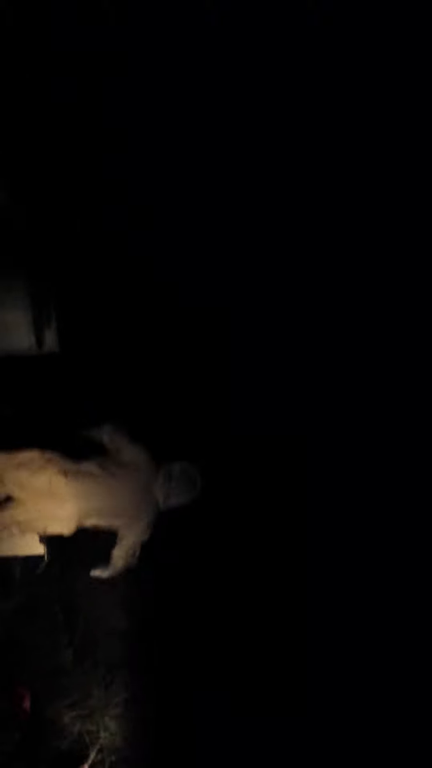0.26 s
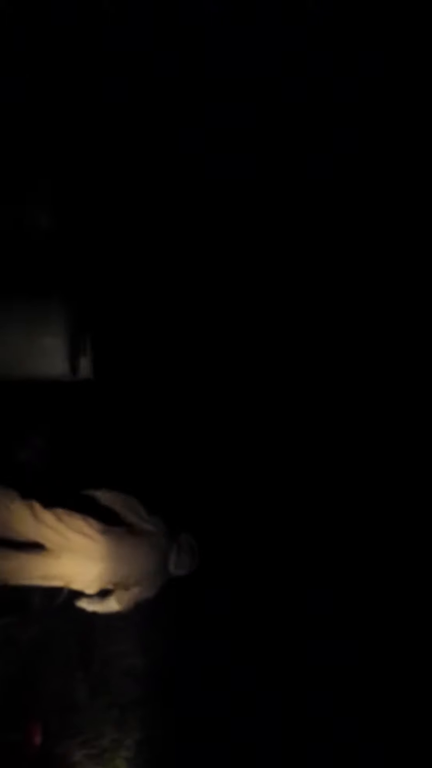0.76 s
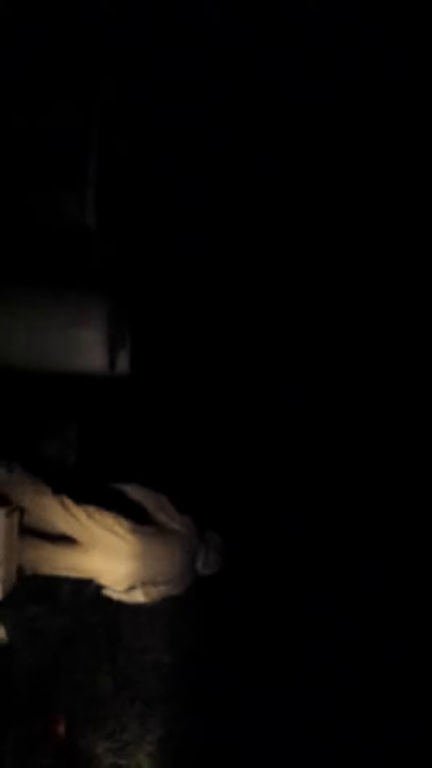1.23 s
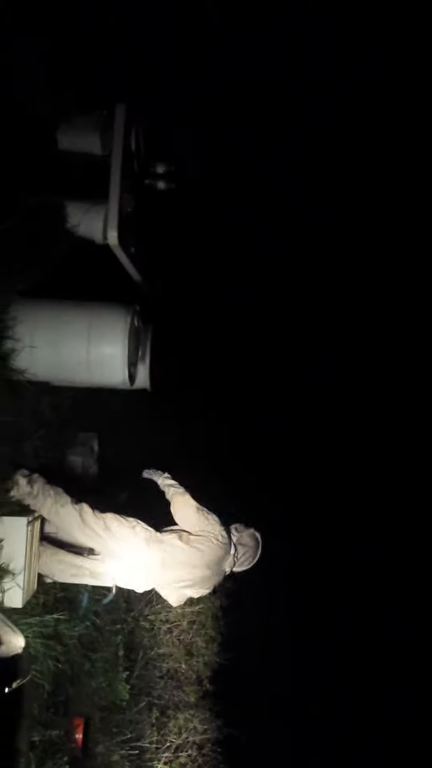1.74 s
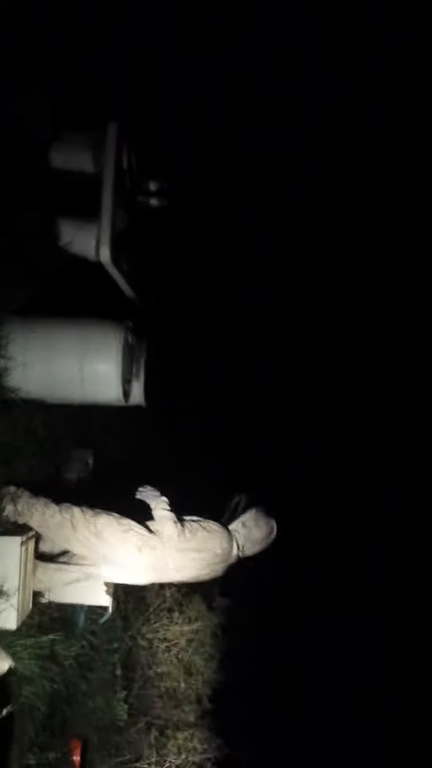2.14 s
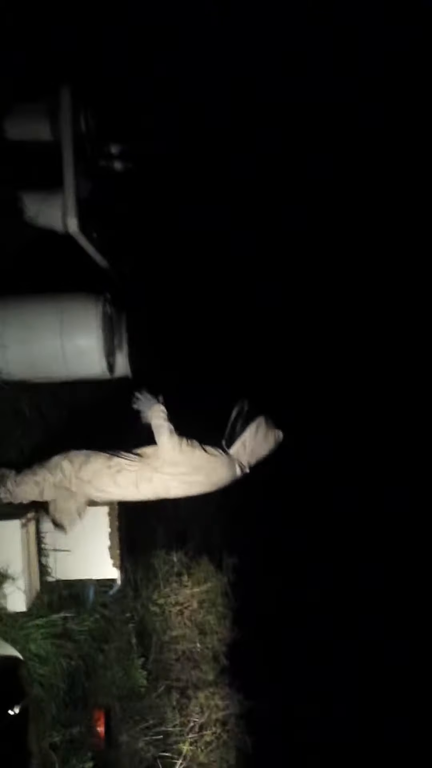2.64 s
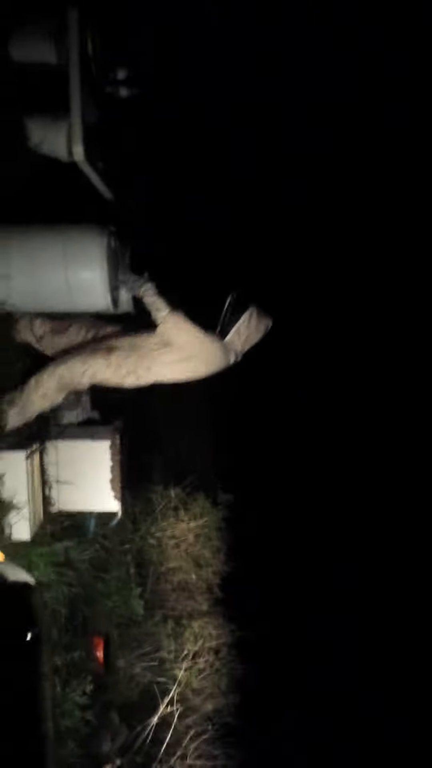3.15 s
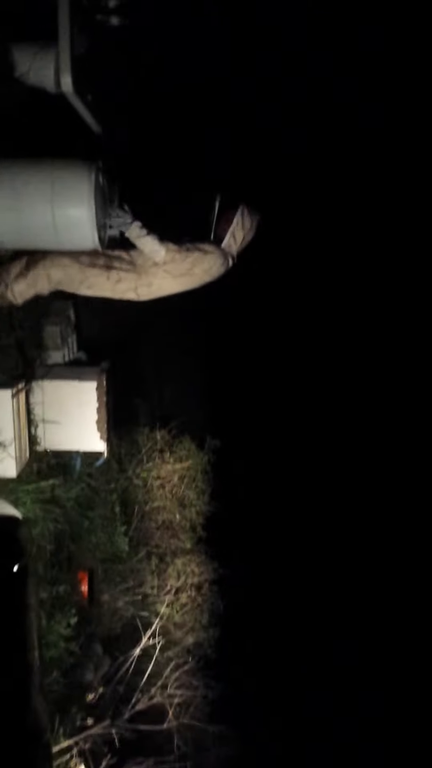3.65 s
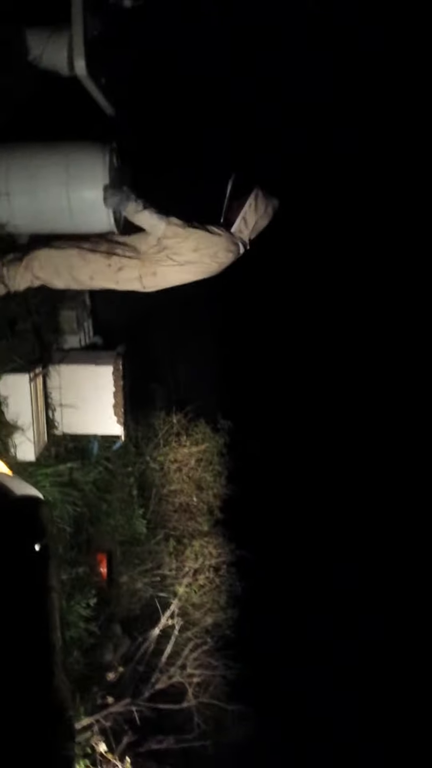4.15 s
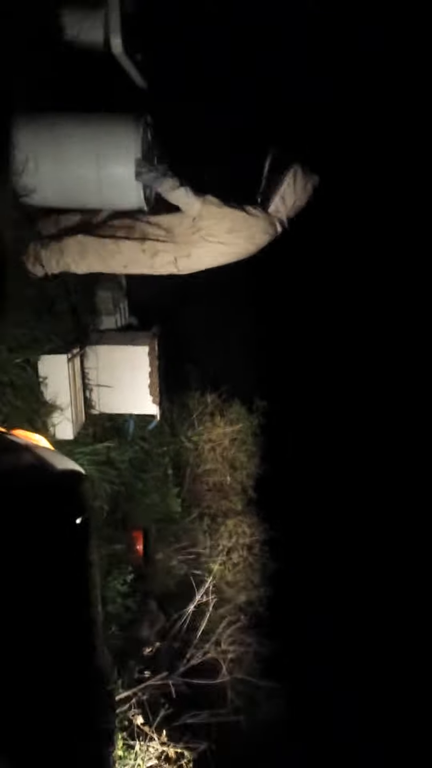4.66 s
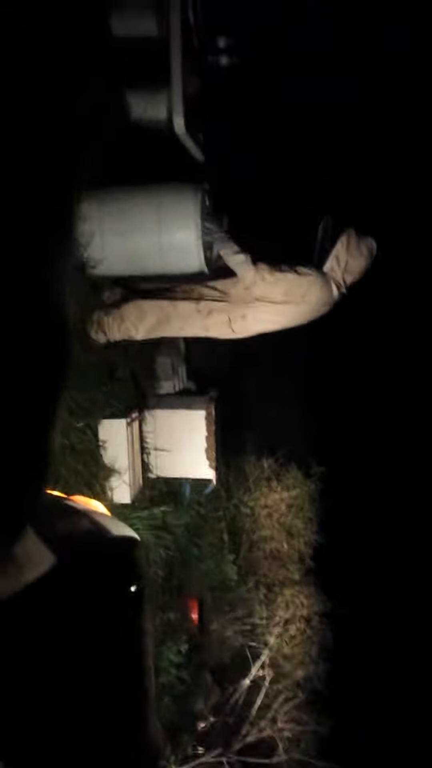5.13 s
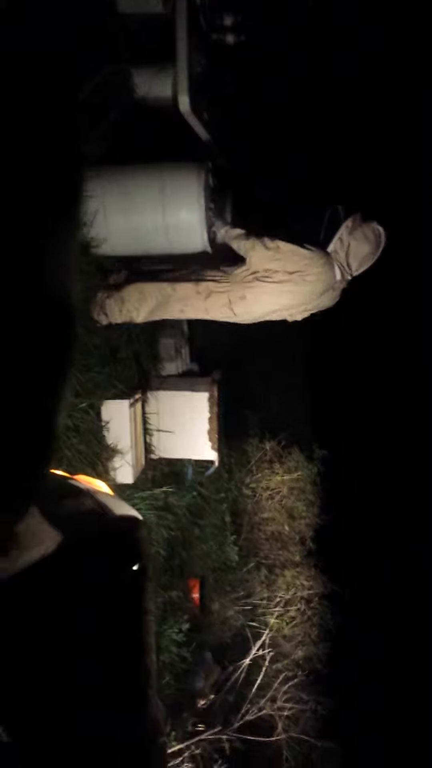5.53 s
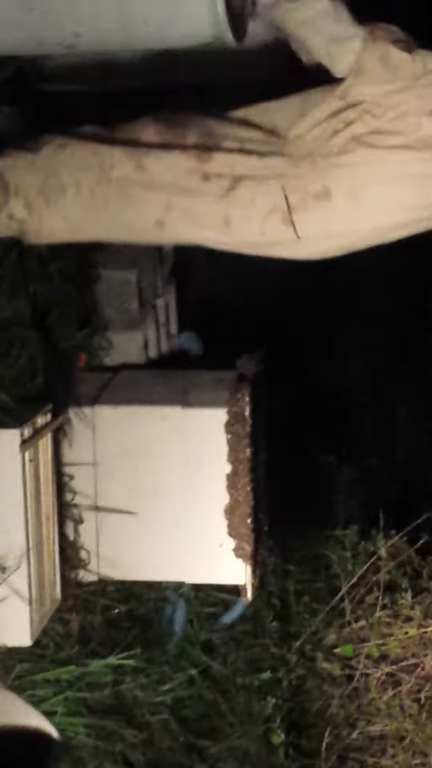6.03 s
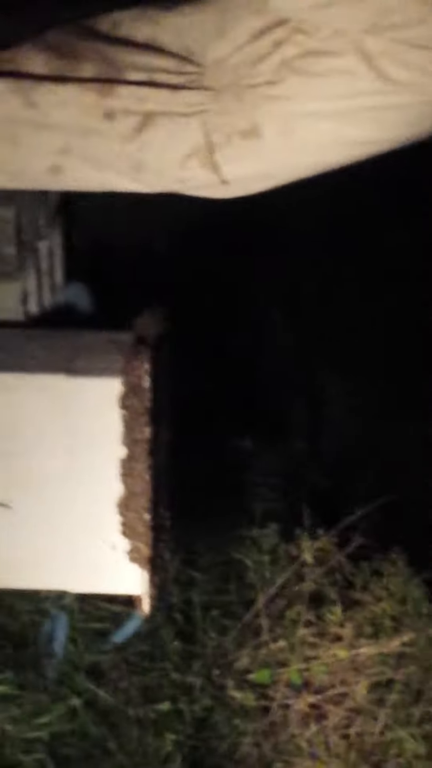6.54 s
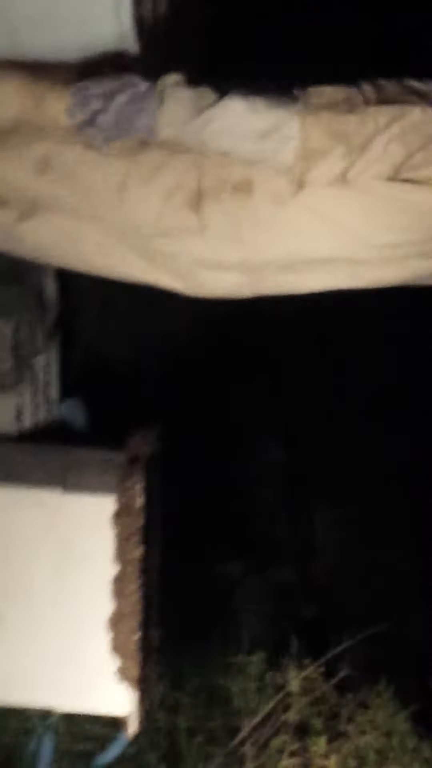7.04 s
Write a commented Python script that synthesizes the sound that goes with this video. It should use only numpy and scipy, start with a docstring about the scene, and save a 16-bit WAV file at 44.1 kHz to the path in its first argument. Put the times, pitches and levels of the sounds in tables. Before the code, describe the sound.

A high cricket chorus over a low outdoor rumble, with a few wooden clacks, soft fabric rustles, a lid creak and sharp microphone clicks.

```python
"""A bee yard at night

Crickets scrape their wings all around, over a low rumble and the hum of a far engine. Hive gear
clacks on a wooden box, a lid creaks and a beekeeper's suit swishes. The camera is bumped, rubbed
and ticked. The sound fades in; two sharp ticks overload the recorder, whose gain control turns
the night down for about a second."""
import sys
import numpy as np
from scipy import signal
from scipy.fft import rfft, irfft
from scipy.io import wavfile

SR = 44100
rng = np.random.default_rng(int(sys.argv[2]) if len(sys.argv) > 2 else 0)


def put_to_file(sound):
    """Save the sound as 16-bit audio at rate SR, in the file named by the first command-line argument."""
    columns = np.atleast_2d(sound).T  # one column per channel
    safe = np.clip(columns, -1, 1)
    whole_steps = np.round(safe * 32767)
    wavfile.write(sys.argv[1], SR, whole_steps.astype(np.int16))


N = 321489
TIME = np.arange(N) / SR

# Near crickets. Each row: wing strokes a second, mid-stroke pitch in Hz, pitch fall in Hz, relative
# level in dB, side in dB (plus is left, minus is right), phase between the ears in radians.
NEAR_CRICKETS = [(38.5, 5690, 660, 0, 3, 4.5), (36.66, 5720, 480, -2.5, 2.5, -0.5),
                 (38.7, 6330, 400, -6.5, 1.5, -1.5)]
# The chorus as the camera turns. Each row: time in seconds, then level, side and near crickets' lift in dB.
CHORUS_LEVELS = [(0.6, -40, 2.5, -1), (1.9, -42, 3, -1.5), (2.4, -39.5, 1, -4.5), (3.2, -42, 2.5, -4),
                 (3.7, -42, 3, -3), (5.5, -40, -2, -2), (6.3, -42.5, -1.5, -3), (6.85, -41.5, -0.5, 2.5),
                 (7.29, -42, -1.5, 0.5)]
# The night air. Each row: time in seconds, then the rumble, wash and hiss levels in dB.
AIR_LEVELS = [(0.6, -39.5, -47.5, -48), (1.7, -40.5, -47.5, -48), (2.6, -40, -45.5, -45),
              (3.3, -38.5, -45.5, -45.5), (4.2, -39, -45, -47.5), (5.6, -40, -45, -47.5),
              (6.85, -39.5, -43, -49.5), (7.29, -40, -44, -48)]
# The far engine. Each row: time in seconds, level in dB.
ENGINE_LEVELS = [(0.6, -46), (1.5, -64), (1.6, -41.5), (3.0, -45.5), (3.1, -54), (4.4, -42.5), (6.4, -56.5),
                 (7.29, -45)]
# How alike outdoor noise is in both ears. Each row: frequency in Hz, likeness from 0 to 1.
EAR_LIKENESS = [(25, 0.33), (60, 0.96), (130, 0.93), (290, 0.94), (640, 0.78), (1400, 0), (3000, 0.024)]

# The tone colour of each noise. Each row: frequency in Hz, relative strength in dB.
FAR_CRICKET_COLOUR = [(4900, -56), (5250, -12), (5500, -1), (5780, -2.5), (6100, 0), (6350, -5.5),
                      (6700, -10.5), (7500, -16), (8300, -14), (8700, -21.5), (10000, -43)]
RUMBLE_COLOUR = [(12, -34), (20, -16), (33, -9.5), (60, -4), (110, 0.5), (160, -1), (215, -5.5),
                 (300, -5.5), (400, -7.5), (490, -20.5), (800, -27), (2000, -60)]
WASH_COLOUR = [(300, -11.5), (500, -4), (660, -0.5), (850, -4), (1100, -4.5), (1400, -10.5), (1800, -9),
               (2400, -14.5), (3200, -19.5), (6000, -39.5)]
LEFT_HISS_COLOUR = [(600, 7), (2000, -1.5), (4500, 1.5), (7000, 5.5), (9200, -2.5), (10100, -11),
                    (14500, -27)]
RIGHT_HISS_COLOUR = [(600, 3), (2000, -2.5), (4500, -6.5), (7200, 4.5), (9200, -6), (11300, -4),
                     (14500, -7.5)]
CRACK_COLOUR = [(200, -15), (600, -13), (1300, -13.5), (1900, -7), (2450, -10), (3000, -5.5), (3700, -13.5),
                (4250, -1), (4900, -9), (6000, -4.5), (7500, 2.5), (8600, -11), (10500, -21),
                (12600, -14.5), (14500, -23)]
SUIT_COLOUR = [(500, -49), (2500, -6.5), (4500, -4.5), (6000, 1.5), (7700, 4), (9200, -4), (11000, -5),
               (14500, -11)]
SNAG_COLOUR = [(2500, -31), (5000, -12), (7800, 10.5), (9200, 9), (10500, 4), (14500, -8)]
SHUDDER_COLOUR = [(20, -20), (60, -10), (130, 9), (220, -3.5), (420, -17.5), (800, -19), (1200, -23),
                  (1800, -40), (4000, -55)]
RUB_COLOUR = [(150, -4), (700, 4.5), (1300, 7.5), (2400, 0), (4000, -15.5), (6500, -6), (9000, -14),
              (11000, -44)]
FIZZ_COLOUR = [(800, 1.5), (2400, 3.5), (5000, 3), (8000, -2.5), (10500, -20), (14500, -33)]

# The ringing tones of the wooden box, the lid, and the camera's body and case.
# Each row: pitch in Hz, relative level in dB, seconds to fade by 60 dB.
BOX_TONES = [(320, 0.5, 0.045), (435, 5.5, 0.058), (568, 12, 0.064), (618, 12, 0.052), (740, 3, 0.05),
             (1030, 3, 0.07), (1320, 1.5, 0.042), (1845, 4.5, 0.04), (2410, -14, .07), (6220, 4, .05)]
LID_TONES = [(1850, 4, 0.0055), (2315, 15, 0.0071), (2500, -4, 0.01), (3220, -6, .008)]
BODY_TONES = [(140, -15, .12), (408, 5, 0.1), (428, 1, 0.23), (760, 4, 0.056), (990, -5, 0.027),
              (1220, -5, 0.067)]
CASE_TONES = [(905, -12, 0.0051), (2370, 8.5, 0.0019), (3000, -21, 0.0015), (3600, 9.5, 0.002),
              (6490, 15.5, 0.0019), (8260, 1, 0.0036)]

# Hive gear knocks. Each row: start in seconds, crack level in dB, rise and fall in seconds,
# box ring in dB before its lift.
GEAR_CLACKS = [(0.412, -36, .0004, .002, -68.5), (0.5089, -23, 0.00069, 0.0076, -21.5),
               (1.2538, -16, 0.0033, 0.003, -34.5), (1.3275, -16, 0.0024, 0.0019, -31),
               (2.7582, -44, 0.00091, 0.0018, -55), (4.4052, -19.5, 0.00016, 0.0019, -24),
               (4.4297, -31.5, 0.00097, 0.0022, -37)]
# Lid creaks. Each row: start in seconds, length in seconds, level in dB.
LID_CREAKS = [(0.413, .007, -27), (2.761, .007, -26.5), (6.271, .007, -31), (6.3657, .195, -34.5),
              (6.777, .025, -39), (6.824, .025, -30)]
# Sleeve and leg movements. Each row: middle and half length in seconds, level and side in dB.
SUIT_SWISHES = [(3.03, 0.062, -41, 1), (3.61, 0.13, -40, 5), (4.478, 0.13, -41.5, 3),
                (4.8, 0.08, -51.5, -14), (7.2, 0.15, -49.5, -3)]
# The fabric catches. Each row: start in seconds, level in dB.
SUIT_SNAGS = [(3.308, -40), (3.315, -34), (6.448, -39.5), (7.258, -35)]
# Bumps on the camera. Each row: start in seconds, strength in dB, pitch in Hz, side in dB.
CAMERA_BUMPS = [(3.987, -16.5, 99, 27), (4.1102, -19.5, 90, 22), (4.139, -15, 126, 9),
                (4.4053, -4, 169, -2), (4.562, -19.5, 88.5, 24)]
# Finger slides. Each row: middle and half length in seconds, level and side in dB, fizz as a factor.
FINGER_RUBS = [(4.433, 0.014, -40, -2, 0.1), (4.65, 0.013, -28, 14, 1.35), (4.865, 0.015, -29, 10, 0.064)]
# Ticks by the left microphone. Each row: start in seconds, strength in dB, side in dB.
CASE_TICKS = [(4.803, -15.5, 16), (4.8136, -9.5, 28), (4.9093, 22.5, 27), (5.1184, 13, 15),
              (5.453, -18, 12)]


def amp(db):
    """Turns decibels into a gain."""
    return 10 ** (np.asarray(db) / 20)


def evened(x):
    """Scales a signal to an average power of one."""
    return x / np.sqrt(np.mean(x ** 2) + 1e-20)


def read(points, hz):
    """Looks up frequencies in a table, giving each octave equal room."""
    f, value = np.transpose(points)
    return np.interp(np.log(hz + 1), np.log(f), value)


def curves(rows):
    """Each column of a time table, at every sample."""
    times, *columns = np.transpose(rows)
    return [np.interp(TIME, times, column) for column in columns]


def pan(db):
    """Left and right gains that keep the total power the same."""
    gains = np.array([amp(np.atleast_1d(db) / 2), amp(-np.atleast_1d(db) / 2)])
    return gains / np.sqrt(np.mean(gains ** 2, axis=0))


def add(mix, start, sound):
    """Mixes a sound in, start seconds from the beginning."""
    part = mix[:, round(start * SR):][:, :sound.shape[-1]]
    part += sound[..., :part.shape[-1]]


def drift(hz):
    """A random wobble, mostly slower than hz."""
    f = np.fft.rfftfreq(N, 1 / SR)
    return evened(irfft(rfft(rng.standard_normal(N)) * np.exp(-(f / hz) ** 2), N))


def noise(colour, size=N, grain_db=0):
    """Stereo noise, alike in both ears in the bass; grain_db makes it gritty."""
    hz = np.fft.rfftfreq(size, 1 / SR)
    left, other = rfft(rng.standard_normal((2, size)) * amp(grain_db * rng.standard_normal(size)))
    likeness = np.clip(read(EAR_LIKENESS, hz), -1, 1)
    right = likeness * left + np.sqrt(1 - likeness ** 2) * other
    return evened(irfft(np.array([left, right]) * amp(read(colour, hz)), size))


def ring(tones, t):
    """Tones dying away after a blow, with a peak of one."""
    wave = sum(amp(db - 60 * t / fade) * np.sin(2 * np.pi * hz * t) for hz, db, fade in tones)
    return wave / abs(wave).max()


def swell(middle, half):
    """A bell-shaped rise and fall in level."""
    return np.exp(-.5 * ((TIME - middle) / half) ** 2)


def yard(x, fade_s, echo_db):
    """Ground, boxes and bushes scatter short echoes, different in each ear."""
    t = np.arange(SR // 3) / SR
    echoes = rng.standard_normal((2, len(t))) * (rng.random((2, len(t))) < 2000 / SR)
    echoes *= amp(-60 * t / fade_s)
    echoes *= amp(echo_db) / np.linalg.norm(echoes, axis=1, keepdims=True)
    return x + signal.fftconvolve(np.atleast_2d(x), echoes, axes=1)[:, :N]


def cricket(rate, hz, fall_hz, db, side_db, ear_phase, duty=.6, jitter=.02, waver_hz=50, uneven_db=2.5):
    """Each wing stroke drags a scraper over tiny teeth: a short tone that falls as the wing slows."""
    cycles = np.cumsum(rate * (1 + jitter * drift(6))) / SR
    stroke = cycles % 1 / duty  # silent once this passes 1
    pressure = np.sin(np.pi * np.minimum(stroke, 1)) * amp(uneven_db * drift(15))
    phase = 2 * np.pi * np.cumsum(hz - fall_hz * (stroke - .5) + waver_hz * drift(120.2)) / SR
    tone = pressure * np.array([np.sin(phase), np.sin(phase + ear_phase)])
    return amp(db) * pan(side_db) * evened(yard(tone, fade_s=0.048, echo_db=-4.5))


def chorus(far_db=-1, thin_hz=8450, thin_db=-20, throb_hz=40):
    """A few near trills stand out of a blur of far ones; one insect throbs on a thin high note."""
    level_db, side_db, near_db = curves(CHORUS_LEVELS)
    near = amp(near_db) * evened(sum(cricket(*row) for row in NEAR_CRICKETS))
    far = noise(FAR_CRICKET_COLOUR) * amp(far_db + drift(54))
    throb = 1 + 0.87 * np.sin(2 * np.pi * throb_hz * TIME)
    thin = np.array([drift(70), drift(70)]) * np.sin(2 * np.pi * thin_hz * TIME)
    thin *= throb * amp(thin_db + 2 * drift(2.3))
    return amp(level_db) * pan(side_db) * evened(near + far + thin)


def engine(hz=52.8, octave_db=-9):
    """A far engine hums on a wavering low note and the octave above."""
    level_db, = curves(ENGINE_LEVELS)
    turns = np.cumsum(hz * (1 + 0.0234 * drift(5))) / SR
    hum = (1 + 0.3 * drift(18)) * np.sin(2 * np.pi * turns)
    hum += amp(octave_db) * (1 + 0.8 * drift(15)) * np.sin(4 * np.pi * turns)
    return amp(level_db) * evened(hum)


def night_air():
    """Low rumble, a distant wash of noise and thin hiss, each flickering a little."""
    rumble_db, wash_db, hiss_db = curves(AIR_LEVELS)
    rumble = amp(rumble_db + 0.89 * drift(15)) * noise(RUMBLE_COLOUR)
    wash = amp(wash_db + 0.68 * drift(32)) * noise(WASH_COLOUR, grain_db=2.5)
    left = noise(LEFT_HISS_COLOUR, grain_db=4.5)[0]
    right = noise(RIGHT_HISS_COLOUR, grain_db=1)[1]
    hiss = amp(hiss_db + 1.33 * drift(30)) * pan(-4.2) * np.array([left, right])
    return rumble + wash + hiss


def gear_clacks(box_lift_db=12.5, box_delay_s=0.0031):
    """Hive gear hits with a rough crack, then the wooden box rings."""
    out, t = np.zeros((2, N)), np.arange(SR // 5) / SR
    box = ring(BOX_TONES, t) * (1 - np.exp(-t / 0.0013))
    for start, db, rise, fall, box_db in GEAR_CLACKS:
        contact = (1 - np.exp(-t / rise)) ** 2 * np.exp(-t / fall)
        crack = noise(CRACK_COLOUR, size=len(t), grain_db=4)
        add(out, start, amp(db) * contact / contact.max() * crack)
        add(out, start + box_delay_s, amp(box_db + box_lift_db) * box)
    return out


def lid_creaks(slips_per_s=69.5, skew=0.51, uneven_db=4.5, side_db=6):
    """The lid slips once, or in even steps as the pressure swells and eases."""
    out, t = np.zeros((2, N)), np.arange(SR // 5) / SR
    slip = pan(side_db) * ring(LID_TONES, t)
    for start, length, db in LID_CREAKS:
        delays = np.arange(0, length, 1 / slips_per_s)
        progress = (np.arange(len(delays)) + .5) / len(delays)
        pressure = np.sin(np.pi * progress ** skew)
        for delay, force in zip(delays, pressure):
            add(out, start + delay, force * amp(db + uneven_db * rng.standard_normal()) * slip)
    return out


def suit(snag_side_db=-8, snag_fall_s=0.0038):
    """The suit's fibres catch and slip, making soft swishes and sudden snags."""
    out = noise(SUIT_COLOUR, grain_db=5.5) * amp(1.3 * drift(40))
    out *= sum(amp(db) * pan(side_db) * swell(middle, half) for middle, half, db, side_db in SUIT_SWISHES)
    t = np.arange(SR // 20) / SR
    for start, db in SUIT_SNAGS:
        snag = np.exp(-t / snag_fall_s) * noise(SNAG_COLOUR, size=len(t), grain_db=8)
        add(out, start, amp(db) * pan(snag_side_db) * snag)
    return out


def camera_bumps(push_cycles=0.63, shudder_db=-15.5, shudder_fall_s=0.086):
    """A bump pushes the camera for a cycle or two and leaves it shuddering."""
    out, t = np.zeros((2, N)), np.arange(SR // 2) / SR
    shudder_shape = (1 - np.exp(-t / 0.00057)) * np.exp(-t / shudder_fall_s)
    for start, db, hz, side_db in CAMERA_BUMPS:
        fall = push_cycles / hz
        push_shape = t / fall * np.exp(1 - t / fall) * np.exp(-(t / (3 * fall)) ** 2)
        push = amp(db) * push_shape * np.sin(2 * np.pi * hz * t)
        body = amp(3 * db - 0.5) * ring(BODY_TONES, t)  # only hard bumps ring clearly
        shudder = amp(db + shudder_db) * shudder_shape * noise(SHUDDER_COLOUR, size=len(t))
        add(out, start, pan(side_db) * (push + body + shudder))
    return out


def finger_rubs():
    """Fingers slide on the camera: a dull, gritty rub mixed with bright fizz."""
    rub, fizz = noise(RUB_COLOUR, grain_db=6), noise(FIZZ_COLOUR, grain_db=4.5)
    return sum(amp(db) * pan(side_db) * swell(middle, half) * evened(rub + bright * fizz)
               for middle, half, db, side_db, bright in FINGER_RUBS)


def case_ticks(lag_s=.00008):
    """Ticks ring the camera's case; the far microphone hears them later, with weaker low tones."""
    out, t = np.zeros((2, N)), np.arange(SR // 2) / SR
    near = ring(CASE_TONES, t)
    far = signal.lfilter([1, -.8], [1], np.interp(t - lag_s, t, near))
    for start, db, side_db in CASE_TICKS:
        add(out, start, amp(db) * pan(side_db) * np.array([near, far]))
    return out


def gain_control(x, overload=1.4, ahead_s=0.037, step_db=5.5, duck_s=0.0077, hold_s=.77,
                 recover_db_per_s=21.5):
    """Just before each overload the volume drops a step, waits, then creeps back."""
    cut_db = np.zeros(N)
    peaks, _ = signal.find_peaks(abs(x).max(axis=0), height=overload, distance=SR // 20)
    for peak in peaks:
        start = max(peak - round(ahead_s * SR), 0)
        age = TIME[:N - start]
        held_db = cut_db[start] + step_db * (1 - np.exp(-age / duck_s))
        recovered_db = recover_db_per_s * np.maximum(age - hold_s, 0)
        cut_db[start:] = np.maximum(held_db - recovered_db, 0)
    return x * amp(-cut_db)


def scene(start_s=0.27, fade_in_s=0.3):
    """Everything together, fading in out of silence."""
    night = chorus() + engine() + night_air()
    hive = yard(gear_clacks() + lid_creaks(), fade_s=0.079, echo_db=-6)
    fade = np.clip((TIME - start_s) / fade_in_s, 0, 1)
    return fade * (night + hive + suit() + camera_bumps() + finger_rubs() + case_ticks())


def record(dry, ceiling=.69, top_hz=14650):
    """The recorder ducks at overloads, flattens the tallest peaks and cuts the highest treble."""
    clipped = np.clip(gain_control(dry), -ceiling, ceiling)
    low_pass = signal.firwin(401, top_hz, window=("kaiser", 8), fs=SR)
    return signal.oaconvolve(clipped, low_pass[None], "same")


dry = scene()
out = record(dry)
put_to_file(out)
```